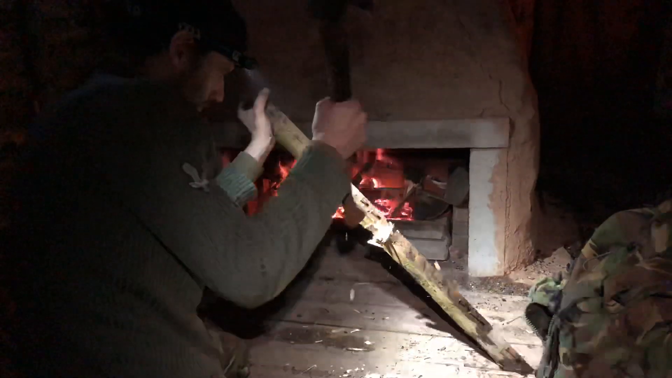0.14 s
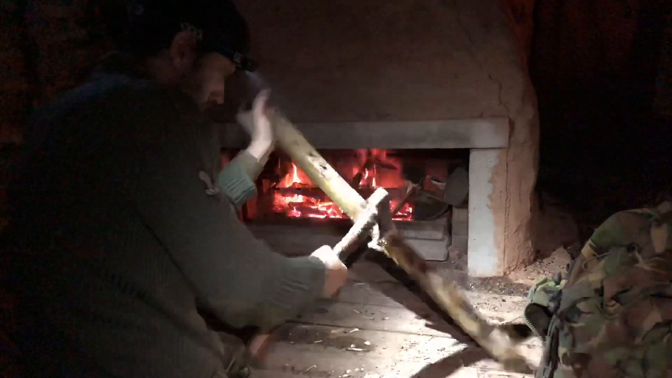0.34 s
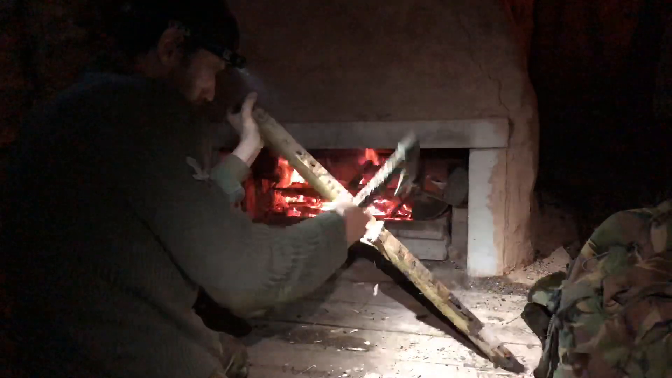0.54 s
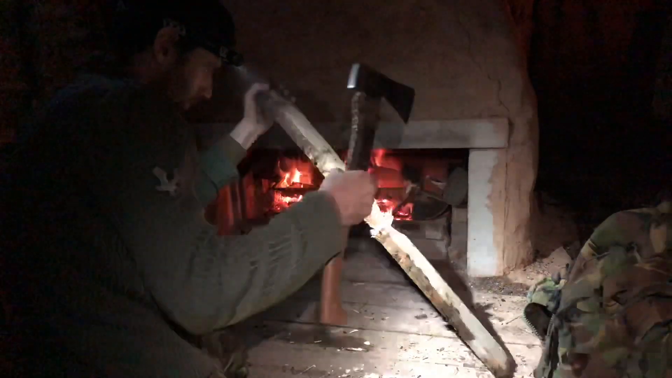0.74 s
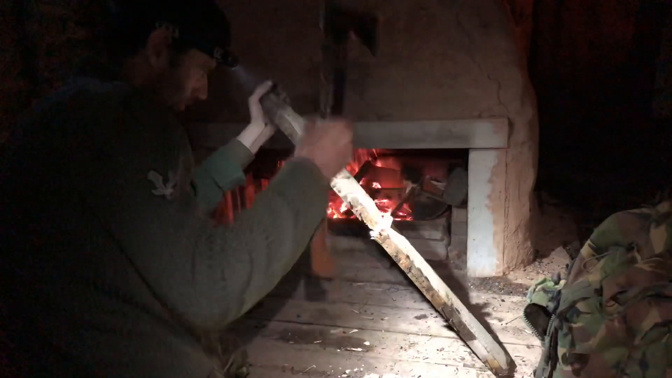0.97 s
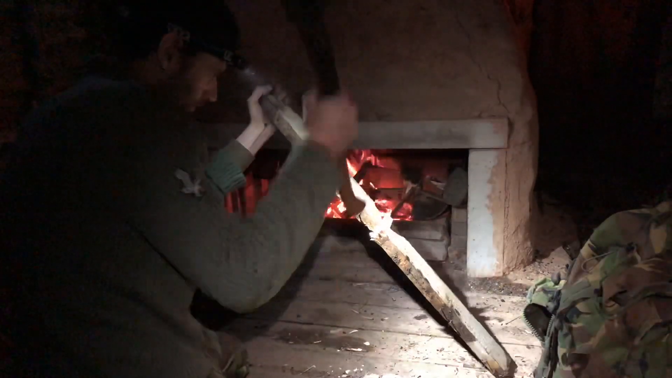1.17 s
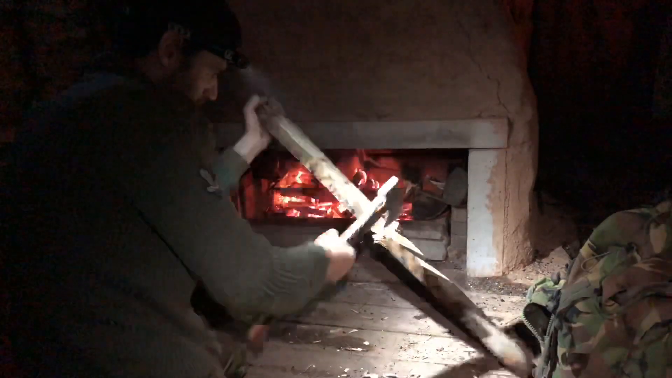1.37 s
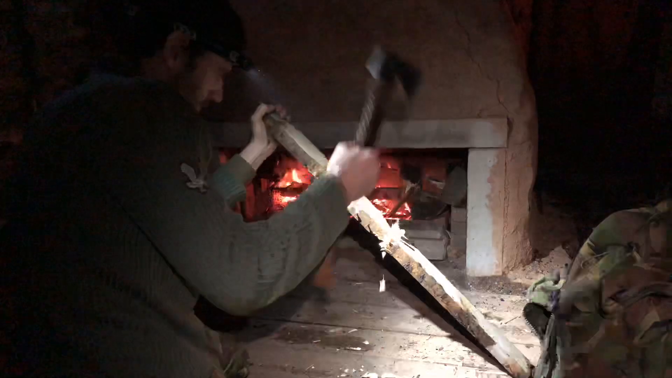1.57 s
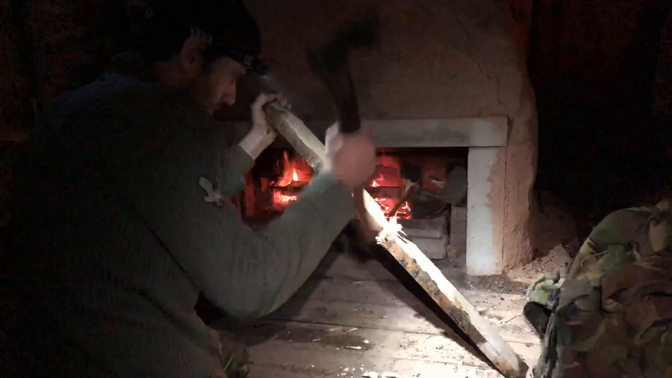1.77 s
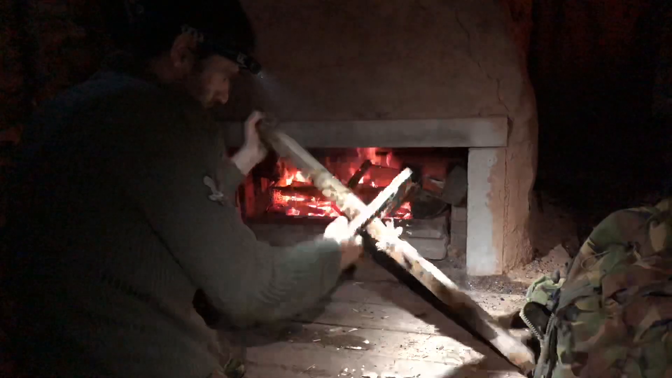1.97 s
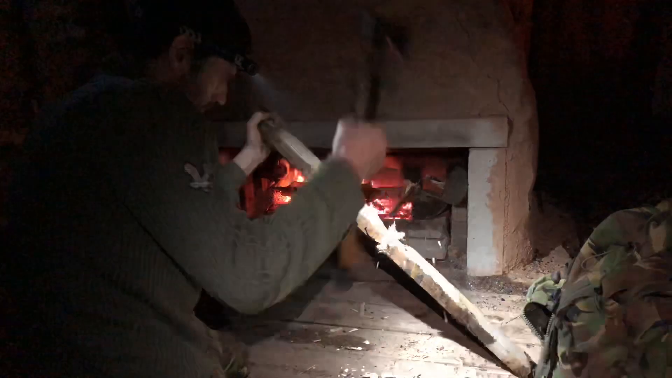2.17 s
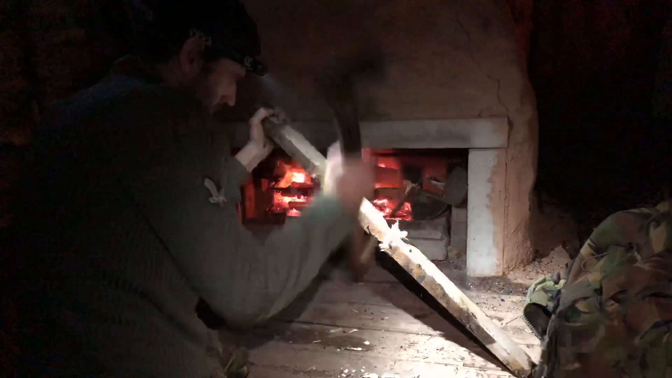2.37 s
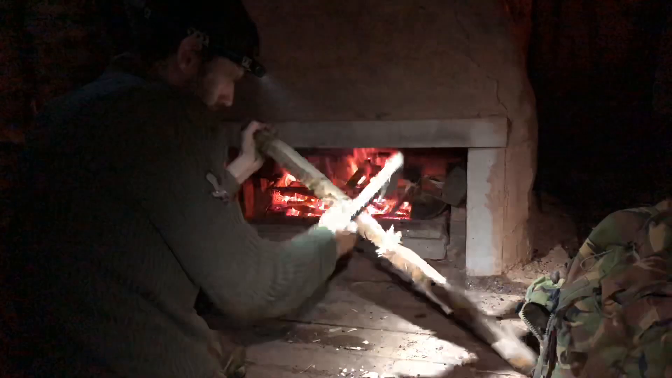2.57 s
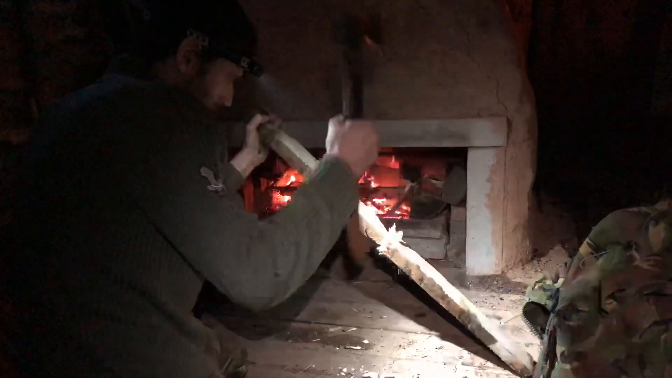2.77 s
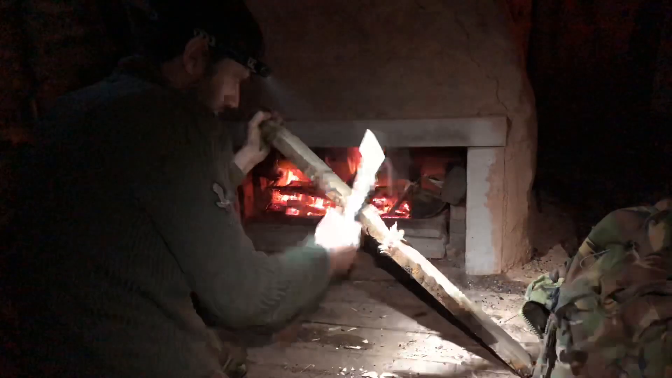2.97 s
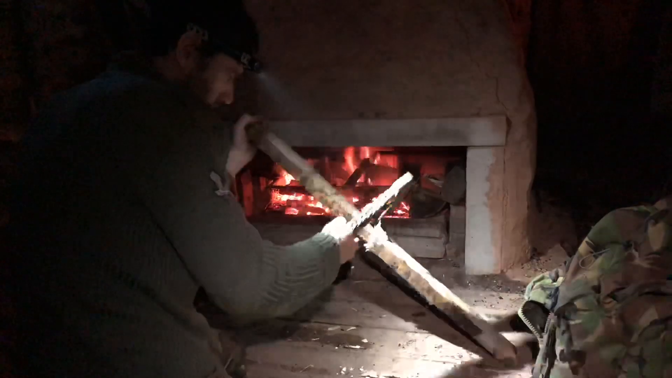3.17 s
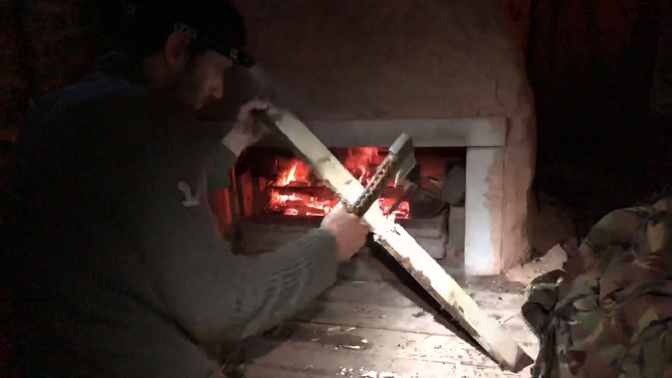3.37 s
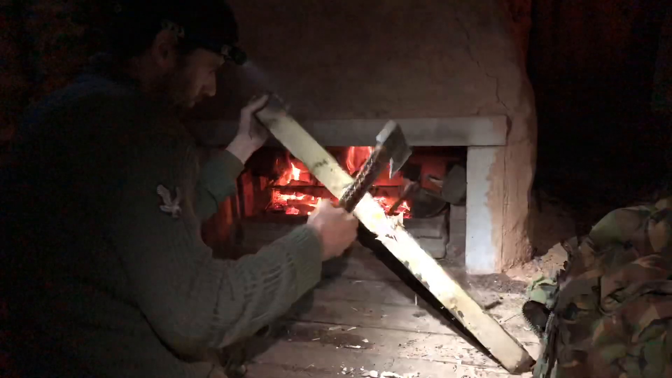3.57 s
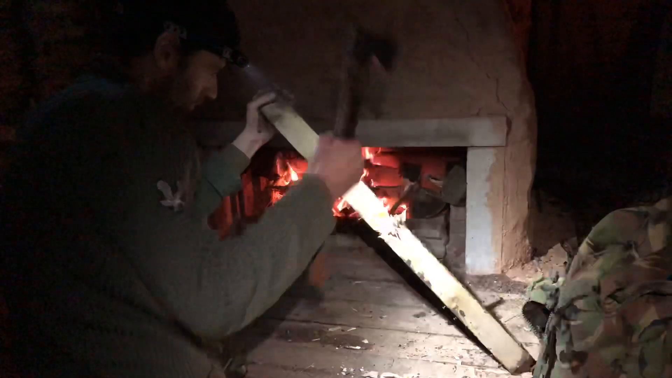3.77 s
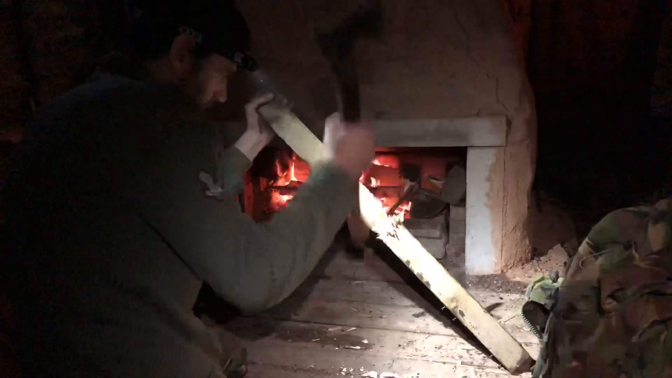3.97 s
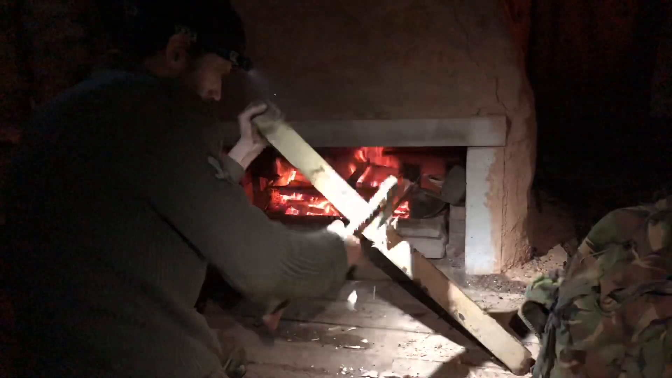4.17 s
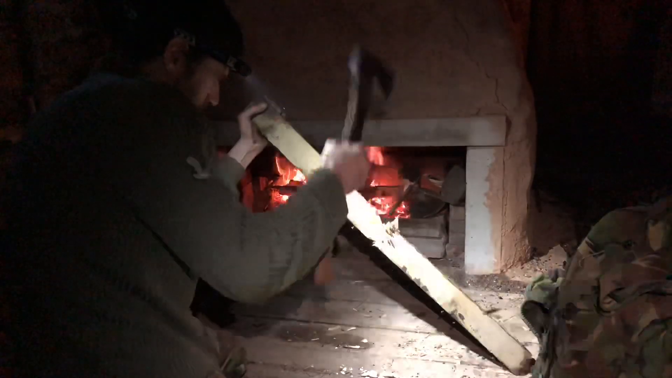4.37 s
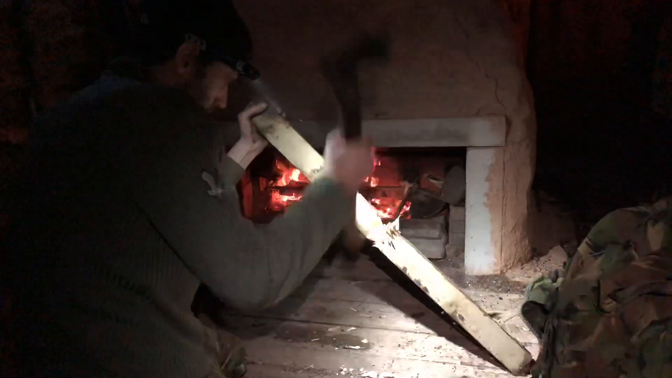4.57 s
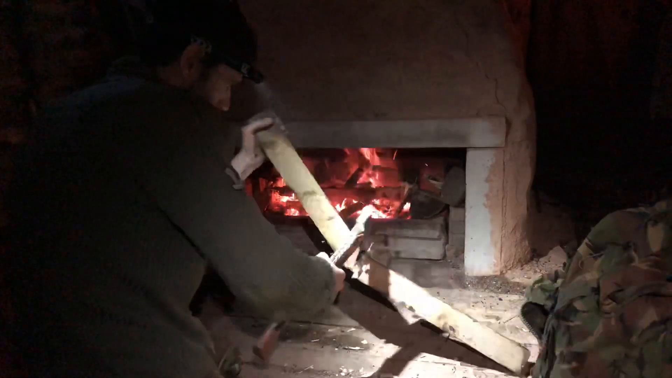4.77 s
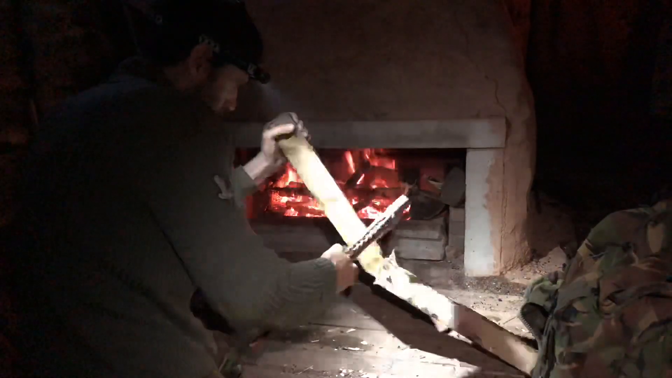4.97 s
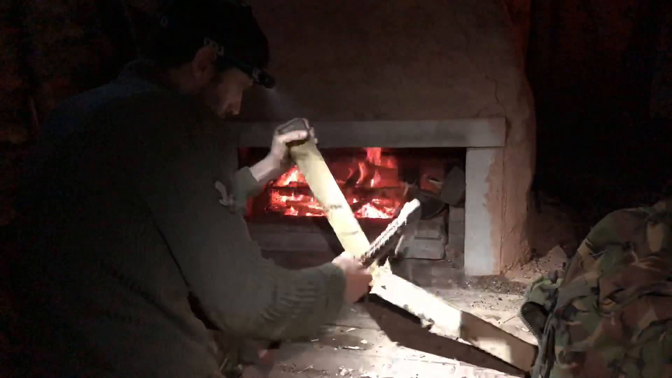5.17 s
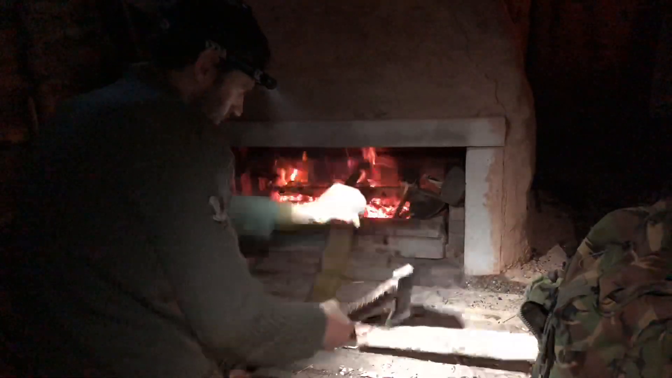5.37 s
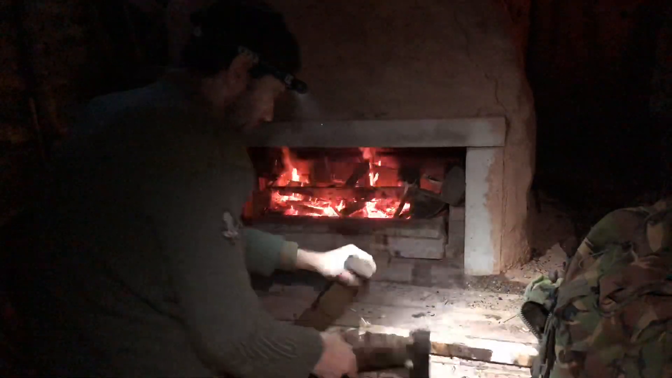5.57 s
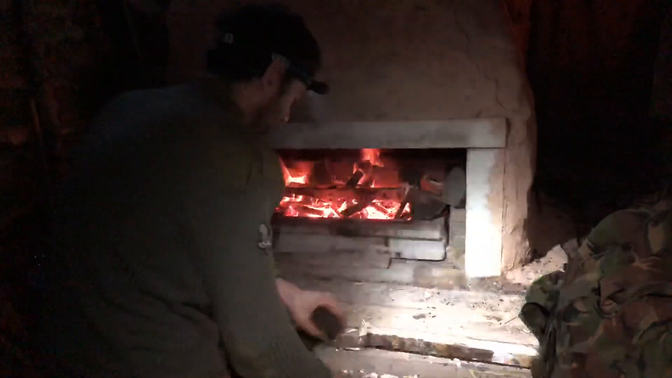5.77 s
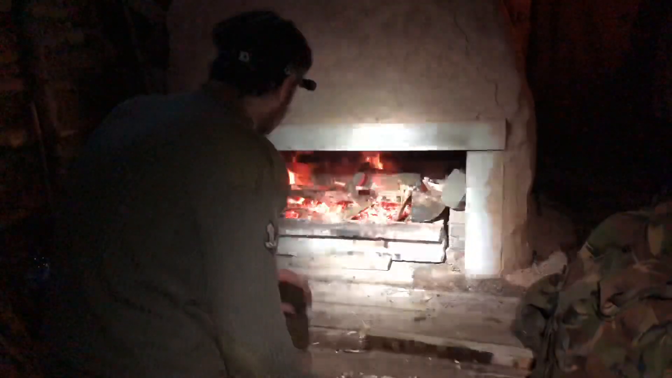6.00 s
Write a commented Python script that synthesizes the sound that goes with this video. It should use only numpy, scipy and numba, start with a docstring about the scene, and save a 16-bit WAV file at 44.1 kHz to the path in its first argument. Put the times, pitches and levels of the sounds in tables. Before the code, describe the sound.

In a small wooden cabin, a hatchet hits a propped plank about seven times, each a loud, dry, cracking knock with a short floorboard thud. The plank end bounces and scuffs between blows, over faint rustling and low fire draught. At the end fibres tear, a bright snap breaks the plank, and pieces bump down. A close camera microphone squashes the blows and lets the short room tail swell back.

```python
"""In a small cabin beside an open fire, a hatchet chops a plank propped on the wooden floor.
The plank bounces and scuffs, then tears at the cut, and the pieces are laid down.
Each contact is a burst of cracking noise, damped plank modes and a slightly later thud of floorboard modes.
Shaped noise makes the draught, rustle, scuffs and tearing; short bright bursts make the pops and snaps.
A camera microphone with a fast limiter ducks the blows and lets the room swell back."""
import sys
import numpy as np
from scipy import signal
from scipy.fft import rfft, irfft, next_fast_len
from scipy.io import wavfile
from scipy.ndimage import map_coordinates
from numba import njit

SR = 44100
rng = np.random.default_rng(int(sys.argv[2]) if len(sys.argv) > 2 else 0)


def transcribe(signal):
    """Save signal, clipped to [-1, 1], as a 16-bit WAV file at the path in sys.argv[1]."""
    frames = np.atleast_2d(signal).T
    limited = np.clip(frames, -1, 1)
    pcm = np.round(limited * 32767).astype(np.int16)
    wavfile.write(sys.argv[1], SR, pcm)


def volts_from_decibels(level):
    """Turn decibel levels (scalar or array-like) into linear amplitude factors."""
    exponent = np.asarray(level, float) / 20
    return 10 ** exponent


N = 266364  # length in samples

# ringing modes of the plank: pitch_hz, level_db, t60_s
PLANK_MODES = [(600, 4.5, 0.016), (692.4, 0.5, 0.03), (810, 2.5, 0.025), (997, 3.5, 0.016),
               (1106, 4.5, 0.018), (1320, 3, 0.019), (1500, 0.5, 0.02), (1588, -7.5, 0.022),
               (1808, -16.5, 0.079), (2090, -4, 0.018), (2330, -1, 0.025), (2532, -10.5, 0.038),
               (3100, -13.5, 0.016), (3480, -7, 0.02)]
# ringing modes of the floorboards: pitch_hz, level_db, t60_s
BOARD_MODES = [(61.4, -23.5, 0.2), (96.3, -15.5, 0.31), (198.8, -11, 0.14), (230, -10.5, 0.11),
               (289, -3, 0.032), (353.7, 3, 0.034), (396.3, -0.5, 0.041), (455, -9, 0.06)]
# colour of splitting fibres, before each sound's own tilt: frequency_hz, level_db (per Hz)
FIBRE_COLOUR = [(700, -10), (1500, -2.5), (3000, -5.5), (5000, -7), (8000, -10), (11000, -10.5),
                (14500, -8.5), (16000, -5.5)]


def unit(x):
    """Scales a sound to rms 1."""
    return x / np.sqrt(np.mean(x ** 2) + 1e-20)


def along(points, hz):
    """Reads (frequency, value) points on a log frequency axis."""
    f, v = np.transpose(points)
    return np.interp(np.log(hz + 1), np.log(f + 1), v)


def wobble(rate):
    """A smooth random curve with rate knots a second."""
    knots = rng.standard_normal(int(N * rate / SR) + 4)
    return map_coordinates(knots, [np.arange(N) * rate / SR])


def filtered(x, response):
    """Multiplies the spectrum of x by a response of frequency."""
    m = next_fast_len(len(x) + 8192)
    return irfft(rfft(x, m) * response(np.fft.rfftfreq(m, 1 / SR)), m)[:len(x)]


def add(track, s, sound):
    """Mixes a sound into a track at s seconds."""
    part = track[round(s * SR):][:len(sound)]
    part += sound[:len(part)]


def swells(rows):
    """Gain per sample: each row climbs to its peak and falls away, straight in dB."""
    t = np.arange(N) / SR
    gain = 0
    for peak_s, db, rise, fall in rows:
        # 20 dB over the rise or the fall, neither shorter than 3 ms
        drop = np.maximum((peak_s - t) / max(rise, .003), (t - peak_s) / max(fall, .003))
        gain = gain + volts_from_decibels(db - 20 * drop)
    return gain


def resonances(modes):
    """Causal response of (Hz, width Hz, dB) peaks, in alternating polarity."""
    def response(f):
        total = 0
        for k, (c, w, db) in enumerate(modes):
            total = total + (-1) ** k * volts_from_decibels(db) * 1j * f * w / (c * c - f * f + 1j * f * w)
        return total
    return response


def fire():
    """The fire's draught and the room's hiss: one coloured noise whose level wanders slowly."""
    # colour of draught and hiss: frequency_hz, level_db (per Hz, relative)
    draught_colour = [(15, -45), (25, -19), (37, -8.5), (59, 2), (92, -12.5), (130, -10), (149, -12),
                      (263, -16), (354, -26), (384, -19), (416, -29.5), (863, -18.5), (1260, -27.5),
                      (2110, -45.5), (16000, -40.5)]
    noise = rng.standard_normal(N)
    air = unit(filtered(noise, lambda hz: volts_from_decibels(along(draught_colour, hz)) * (hz > 22)))
    return volts_from_decibels(-50.5 + 1.3 * wobble(1)) * air


def rustle():
    """Dense small grains of cloth and splinters, stirring between blows over a faint steady floor."""
    # stirrings: peak_s, level_db, rise_s (over 20 dB), fall_s (over 20 dB)
    stirrings = [(.25, -60.5, 0.046, 0.3), (.64, -58, 0.14, 0.28), (1.45, -63.5, 0.18, 0.23),
                 (1.65, -57, 0.17, 0.24), (2.17, -69.5, 0.12, 0.075), (2.35, -65, 0.079, 0.6),
                 (2.58, -64.5, 0.22, 0.18), (3.15, -60.5, 0.37, 0.25), (3.49, -64.5, 0.19, 0.28),
                 (4.45, -66.5, 0.056, 0.05), (4.93, -52, .3, 0.087), (5.33, -63, 0.071, 0.38),
                 (5.52, -57.5, 0.17, 0.094), (5.64, -58, 0.068, 0.14), (5.86, -58.5, 0.11, 0.17)]
    rest_db = -68
    colour = [(500, -35.5), (1500, 2.5), (4000, 0.0), (9000, -4.5), (15000, 2.5)]  # Hz, dB
    grains = rng.standard_normal(N) * volts_from_decibels(2.5 * wobble(350) + 1.5 * wobble(25))
    bright = unit(filtered(grains, lambda hz: volts_from_decibels(along(colour, hz))))
    return (volts_from_decibels(rest_db) + swells(stirrings)) * bright


def burst(length):
    """Noise that swells for a moment and dies: the force of one contact, its envelope peaking at 1."""
    u = 6 * np.arange(SR // 5) / SR / np.clip(length, .0003, .03)  # peak a third of the way in
    envelope = (u / 2) ** 2 * np.exp(2 - np.minimum(u, 50))
    return envelope * rng.standard_normal(len(u))


def snap(length, colour):
    """A crack as heard directly, and the even pulse of like energy that it sends round the room."""
    noise = burst(length)
    pulse = np.linalg.norm(noise) * (np.arange(len(noise)) == 40)  # a single sample
    return filtered(noise, colour), filtered(pulse, colour)


def cabin(x):
    """The room's answer: a new noise tail each time, every frequency dying at its own speed."""
    # reverberation of the cabin: frequency_hz, t60_s
    cabin_decay = [(100, 0.31), (350, 0.11), (800, .14), (2000, 0.14), (5000, 0.13), (15000, 0.11)]
    far_wall_s, far_wall_db = .021, -6  # its answer arrives late and stands out of the tail
    hz, t, z = signal.stft(rng.standard_normal(SR // 3), SR, nperseg=128)
    decay = volts_from_decibels(-60 * t / along(cabin_decay, hz)[:, None])
    near_walls = volts_from_decibels(-10.0 - 60 * t / 0.12)
    far_wall = volts_from_decibels(far_wall_db) * np.exp(-((t - far_wall_s) / 0.0017) ** 2)
    tail = signal.istft(z * decay * (1 + near_walls + far_wall), SR, nperseg=128)[1]
    delayed = np.pad(x, (70, 0))  # samples before the room answers
    return signal.fftconvolve(delayed, tail / np.linalg.norm(tail))


def pops():
    """Pops of the fire and snaps of single fibres: short noise bursts with the room behind them."""
    # pops and snaps: start_s, level_db, tilt_db (per octave)
    pop_rows = [(.186, -9, 3.5), (.5086, -34.5, 8), (.875, -40, 9), (1.5382, -42, 6), (1.6786, -20.5, 5.5),
                (2.133, -43, 4), (2.175, -30.5, 4.5), (2.333, -42, -2), (2.6074, -36, -4),
                (2.9285, -32.5, 7), (3.5452, -31, 8.5), (4.263, -43, -5.5), (4.436, -34, 6.5),
                (4.4603, -30, 5), (4.7705, -28.5, 8), (5.0216, -38, 8), (5.0982, -27.5, 1.5),
                (5.1447, -39, -2), (5.173, -33.5, 1.5), (5.1964, -31, 4), (5.2106, -27, -2.5),
                (5.224, -1, 6), (5.2454, -14.5, 3.5), (5.52, -30.5, 0.5), (5.8087, -35, -1)]
    full_length_s, stretch = 0.0048, 0.12  # length of a 0 dB pop; dB of length per dB of level
    out = np.zeros(N)
    for s, db, tilt_db in pop_rows:
        def colour(hz):
            return volts_from_decibels(along(FIBRE_COLOUR, hz) + tilt_db * np.log2((hz + 1) / 8000))
        pop, spread = snap(full_length_s * volts_from_decibels(stretch * db), colour)
        room = volts_from_decibels(-3) * cabin(spread)[:len(pop)]
        add(out, s, volts_from_decibels(db) * (pop + room))
    return out


def ring(modes, t, centre_hz, slope_db, far_db, cycles):
    """Damped modes, strongest near the pitch the struck spot favours, swelling over some cycles, peak 1."""
    y = 0
    for hz, db, t60 in modes:
        off_centre_db = min(slope_db * np.log2(hz / centre_hz) ** 2, far_db)
        gain_db = db - off_centre_db + rng.normal(0, 1.5)  # no two blows ring alike
        swell = 1 - np.exp(-t * hz / cycles)
        y = y + volts_from_decibels(gain_db - 60 * t / t60) * swell * np.sin(2 * np.pi * hz * t)
    return y / np.abs(y).max()


def contacts(rows, contact, room_db, boom_db, spread_db):
    """Fibres crack, the plank rings, boards thud a moment later; the room takes thuds at their own level."""
    out, t = np.zeros(N), np.arange(SR // 5) / SR
    late = np.maximum(t - .002, 0)
    for s, crack_db, thud_db, thud_hz, knock_db, knock_hz in rows:
        # the more a contact splits rather than knocks, the brighter its crack
        tilt_db = 0.14 * np.clip(crack_db - knock_db + 1.0, -15, 15)

        def colour(hz):
            return volts_from_decibels(along(FIBRE_COLOUR, hz) + tilt_db * np.log2((hz + 1) / 6000))
        crack, even = volts_from_decibels(crack_db) * np.array(snap(contact, colour))
        plank = ring(PLANK_MODES, t, knock_hz, slope_db=spread_db, far_db=26, cycles=0.23)
        knock = volts_from_decibels(knock_db) * (1 - np.exp(-t / 0.0034)) * plank
        boards = ring(BOARD_MODES, late, thud_hz, slope_db=14.0, far_db=17, cycles=0.48)
        thud = volts_from_decibels(thud_db) * (1 - np.exp(-late / 0.0063)) * boards
        room = cabin(volts_from_decibels(room_db) * (even + knock) + volts_from_decibels(boom_db) * thud)[:len(t)]
        add(out, s - .0003, crack + knock + thud + room)
    return out


def chops():
    """Hatchet blows, most in two stages as the blade bites and then bottoms out."""
    # blow stages: start_s, crack_db, thud_db, knock_db, knock_centre_hz
    blows = [(0.3108, -1, 3.5, 16, 1170), (0.3156, -22, 7, 12, 600), (1.3042, 7, -1, 5, 2670),
             (1.3083, -12.5, 7, 7.5, 1300), (1.8708, -6.5, -31, 1.5, 1730), (1.8752, -39.5, 9.5, 11, 810),
             (2.441, -1, 10, 19.5, 1064), (2.9879, -7.5, 0.5, 6.5, 566), (2.9922, -18, 8.5, 3, 600),
             (2.9986, 11, 0, -3, 1780), (4.0688, 5, 2.5, 10, 713), (4.0722, 17, -5, 10, 2400),
             (4.6588, -12.5, -10, 12, 1138), (4.6644, 9, -1, 8.5, 1320)]
    thud_hz = 375  # where the boards answer a blow best
    rows = [(s, crack, thud, thud_hz, *knock) for s, crack, thud, *knock in blows]
    return contacts(rows, contact=0.0058, room_db=-2.0, boom_db=-9, spread_db=8.5)


def bumps():
    """Softer contacts: the plank's end landing after a blow, the break at the cut, pieces laid down."""
    # the plank's end landing again: start_s, crack_db, thud_db, thud_centre_hz, knock_db
    landings = [(.4665, -36, -22, 230, -26.5), (1.4439, -46, -24, 187, -29), (1.9974, -30, -21, 189, -15),
                (2.0671, -51, -24, 372, -50), (2.576, -24.5, -18.5, 188, -12), (3.132, -37, -9, 368, -14)]
    # the plank breaking and its pieces laid down: start_s, crack_db, thud_db, knock_db, knock_centre_hz
    pieces = [(5.067, -27.5, -58, -21.5, 1550), (5.099, -45, -44, -23, 1560),
              (5.2026, -22, -53, -20.5, 1630), (5.2239, -27.5, -28.5, -0.5, 1500),
              (5.2444, -28, -27.5, -16, 2330), (5.3281, -26, -22, -23, 1280), (5.3377, -40, -19, -19, 1370),
              (5.3495, -60, -12.5, -19.5, 510), (5.451, -40.5, -19, -24.5, 654),
              (5.4818, -29.5, -16, -20, 600), (5.8126, -22.5, -12, -24.5, 850), (5.8262, -38, -4, -14, 544),
              (5.8594, -34.5, -38, -24, 490), (5.9825, -50.5, -9.5, -42, 517),
              (6.0139, -59.5, -11, -2.5, 814)]
    landing_knock_hz = 734  # where the plank rings best when its end lands
    piece_thud_hz = 319.4  # where the boards answer a laid-down piece best
    rows = [(*row, landing_knock_hz) for row in landings]
    rows += [(s, crack, thud, piece_thud_hz, *knock) for s, crack, thud, *knock in pieces]
    return contacts(rows, contact=0.0052, room_db=-1.5, boom_db=-6.5, spread_db=11.0)


def scuffs():
    """The plank's end scuffs and shudders: uneven noisy pushes stir the modes of boards and plank."""
    # scuffs: peak_s, level_db, rise_s (over 20 dB), fall_s (over 20 dB)
    scuff_rows = [(1.395, -40, 0.033, 0.043), (1.49, -43, 0.11, .2), (1.96, -48, 0.025, .15),
                  (2.084, -47, 0.063, .08), (2.32, -55.5, .2, 0.3), (2.53, -36.5, .03, 0.083),
                  (2.63, -46, 0.042, 0.11), (3.19, -52, .04, 0.17), (3.44, -51.5, 0.33, 0.13),
                  (4.16, -41, .03, .13), (4.75, -48, 0.038, .1), (4.93, -47.5, 0.085, 0.1),
                  (5.36, -39.5, 0.029, 0.079), (5.498, -31.5, 0.038, 0.045), (5.88, -52.5, .03, 0.046)]
    push = rng.standard_normal(N) * volts_from_decibels(3 * wobble(40))
    # a mode's width in Hz is 2.2 / t60; the two lowest board modes stay out
    board_peaks = [(hz, 2.2 / t60, db) for hz, db, t60 in BOARD_MODES[2:]]
    plank_peaks = [(hz, 2.2 / t60, db) for hz, db, t60 in PLANK_MODES]
    boards = unit(filtered(push, resonances(board_peaks)))
    plank = unit(filtered(push, resonances(plank_peaks)))
    return swells(scuff_rows) * (boards + volts_from_decibels(-12.0) * plank)


def tear():
    """Fibres tear as the plank folds: uneven noisy slips ring in the half-cut joint."""
    # tearing: peak_s, level_db, rise_s (over 20 dB, at least 3 ms), fall_s (over 20 dB)
    tear_rows = [(4.942, -47.5, 0.086, 0.14), (5.068, -42, 0.0027, 0.037), (5.102, -47.5, 0.0037, 0.11),
                 (5.16, -61, 0.055, .1), (5.215, -32.5, 0.037, 0.013), (5.25, -30, 0.028, 0.025)]
    # resonances of the half-cut joint: centre_hz, width_hz, level_db
    joint_peaks = [(1560, 220, 5), (2400, 110, -3), (3500, 680, -3.5), (6400, 650, -6.5),
                   (12100, 4800, -11.5)]
    slips = rng.standard_normal(N) * volts_from_decibels(4.7 * wobble(360) + 0.93 * wobble(42))
    return swells(tear_rows) * unit(filtered(slips, resonances(joint_peaks)))


def scene():
    """All sources at one microphone."""
    mix = fire() + rustle() + pops() + chops() + bumps() + scuffs() + tear()
    return mix[None]


@njit
def ducking(over_db, attack, hold, release):
    """Gain cut in dB: follows an overshoot fast, holds, then lets go at a steady pace."""
    cut, now, wait = np.zeros(len(over_db)), 0.0, 0.0
    for i in range(len(over_db)):
        if over_db[i] > now:
            now += attack * (over_db[i] - now)
            wait = hold
        elif wait > 0:
            wait -= 1
        else:
            now = max(now - release, 0.0)
        cut[i] = now
    return cut


def roll_off(x):
    """The treble ends steeply here."""
    return signal.sosfilt(signal.butter(12, 16820, fs=SR, output="sos"), x)


def record(dry):
    """Camera microphone: limiter, soft clipping of what slips past it, band limit and bass cut."""
    threshold_db, attack_s, hold_s, release_db_per_s = -4.5, 0.00016, 0.0016, 900
    top_hz, bass_hz, ceiling = 15900, 45, .9
    sensed = filtered(dry[0], lambda hz: 1j * hz / (1j * hz + 350))  # the limiter heeds bass less
    over_db = 20 * np.log10(np.abs(sensed) + 1e-9) - threshold_db
    cut_db = ducking(over_db, min(1 / (attack_s * SR), 1.0), hold_s * SR, release_db_per_s / SR)
    limited = dry[0] * volts_from_decibels(-cut_db)
    clipped = limited / (1 + np.abs(limited / ceiling) ** 6) ** (1 / 6)

    def band_limit(hz):
        return volts_from_decibels(-35 * np.clip((hz - top_hz + 400) / 400, 0, 1)) * (hz < 16900)

    def bass_cut(hz):
        return (1j * hz / bass_hz) ** 2 / (1 + 1.4j * hz / bass_hz - (hz / bass_hz) ** 2)
    finished = filtered(filtered(clipped, band_limit), bass_cut)
    return roll_off(finished[None])


dry = scene()
out = record(dry)
transcribe(out)
```